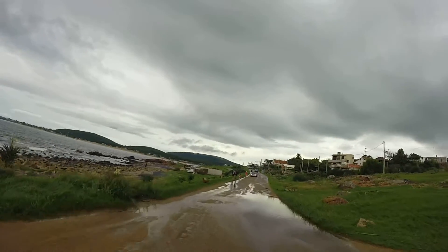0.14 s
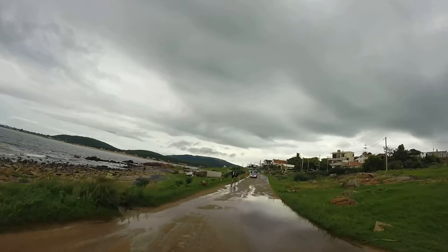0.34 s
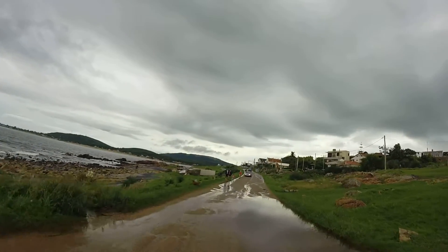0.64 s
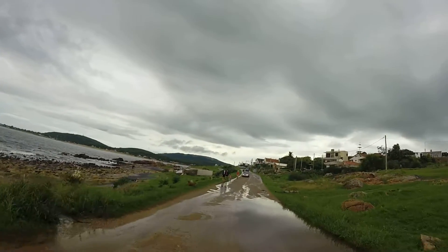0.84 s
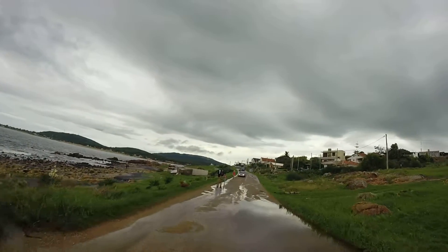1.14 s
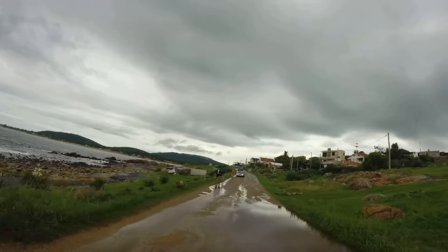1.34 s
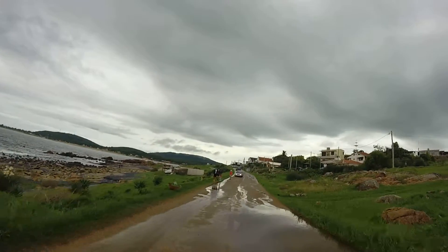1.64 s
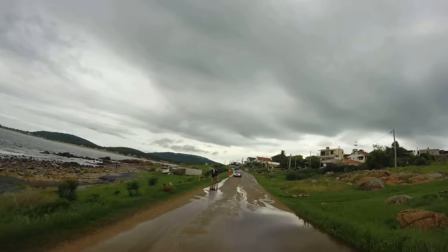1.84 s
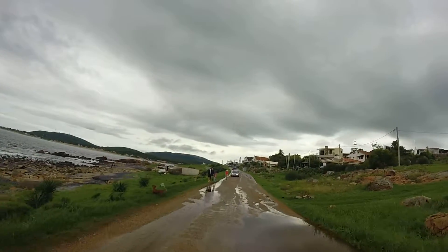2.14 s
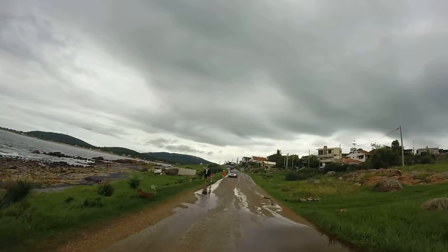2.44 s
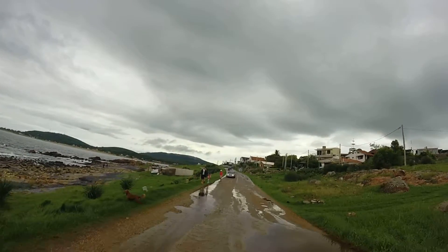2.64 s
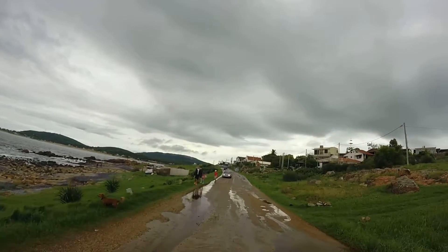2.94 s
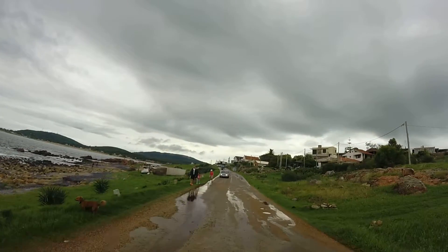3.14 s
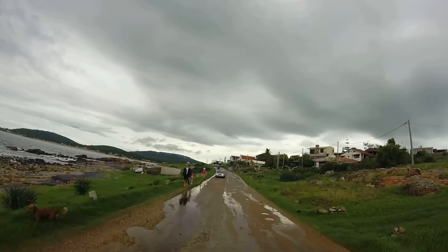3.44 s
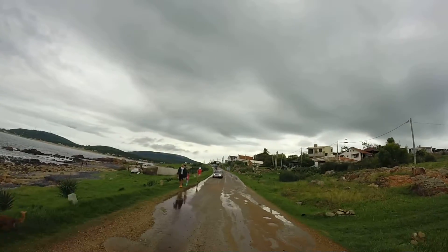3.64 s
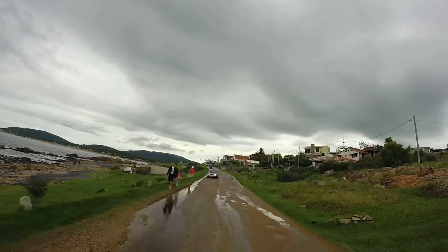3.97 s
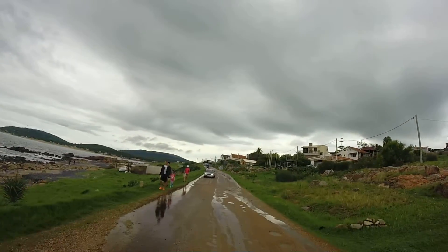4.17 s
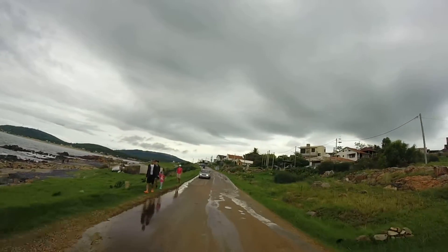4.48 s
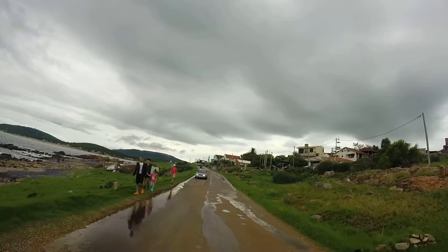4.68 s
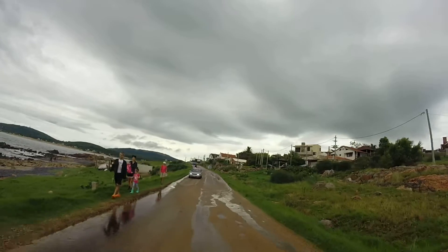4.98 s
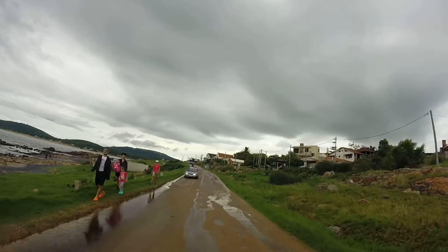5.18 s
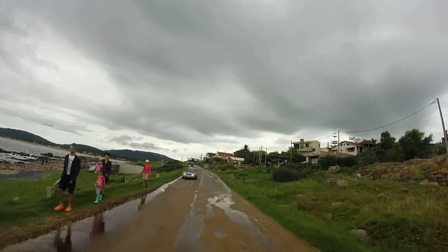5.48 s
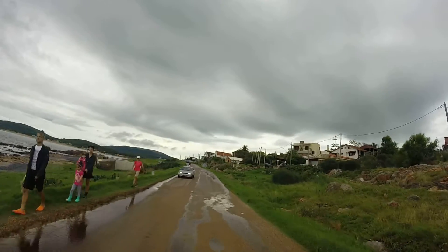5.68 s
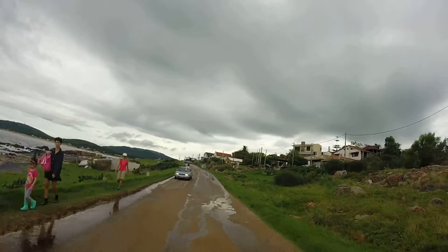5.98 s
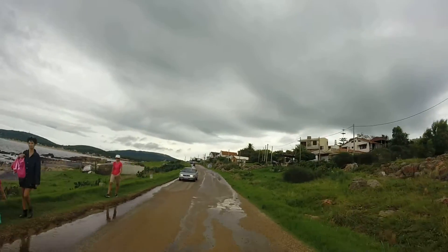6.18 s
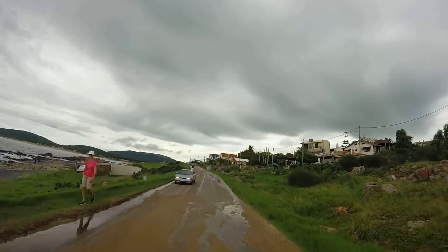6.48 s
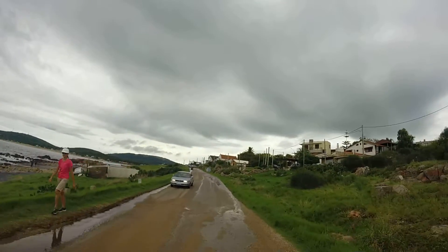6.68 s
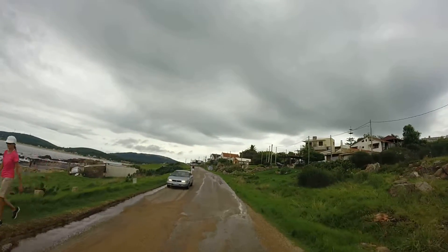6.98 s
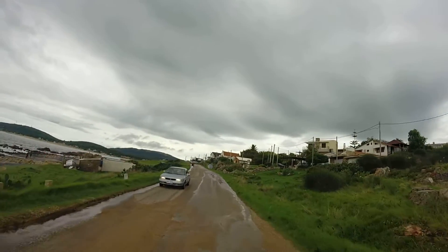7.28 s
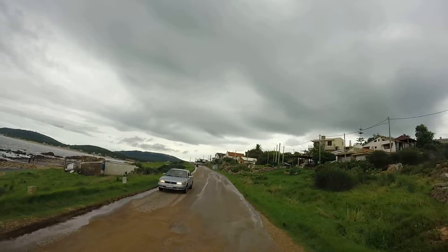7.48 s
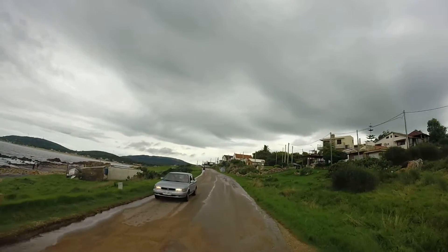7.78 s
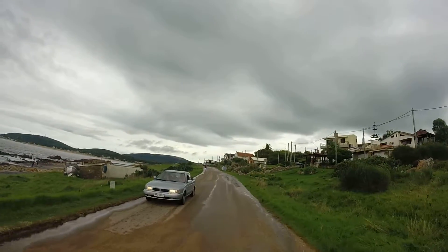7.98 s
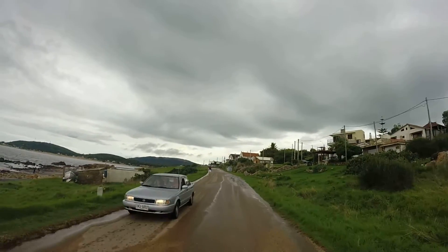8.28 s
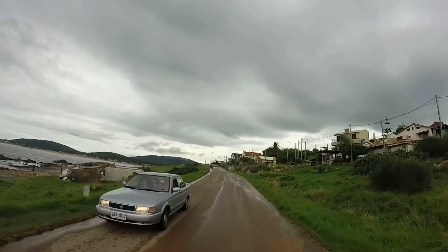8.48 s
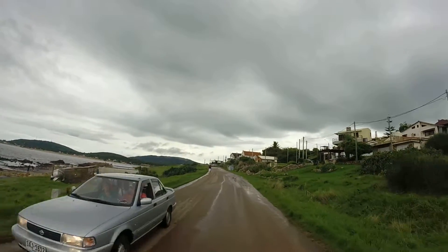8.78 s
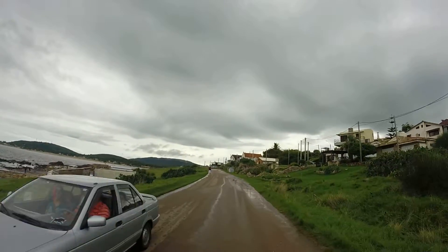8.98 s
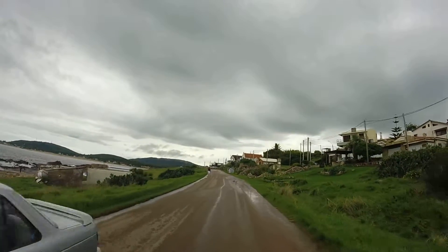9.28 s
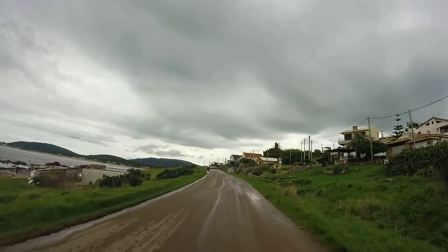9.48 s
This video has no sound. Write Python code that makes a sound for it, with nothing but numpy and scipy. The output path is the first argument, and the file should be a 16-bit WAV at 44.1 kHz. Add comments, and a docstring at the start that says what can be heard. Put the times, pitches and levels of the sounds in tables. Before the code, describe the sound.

A deep, wavering rumble runs throughout, picked up by a microphone mounted on a car moving over wet dirt. A bump and a clattering loose part come first, then soft splashes and ticks of grit under the wheels. Past the middle comes a cluster of dull thuds and sharp clacks, followed by a few separate knocks. A thin, watery tyre hiss comes and goes beneath the rumble.

```python
"""Car on a wet dirt road

Heard from the car's body, which the road shakes into one low, booming resonance. Bumps thud and a loose
part clacks; the mount squeaks. Tyres roar, hiss and crackle on wet grit; puddles spray the underside.
At the end the mist of an oncoming car swells faintly."""
import sys
import numpy as np
from scipy import signal
from scipy.fft import rfft, irfft, next_fast_len
from scipy.io import wavfile
from scipy.ndimage import uniform_filter1d, map_coordinates

SR = 44100
rng = np.random.default_rng(int(sys.argv[2]) if len(sys.argv) > 2 else 0)


def to_wav(s):
    """Save 16-bit WAV."""
    ch = np.atleast_2d(s).T  # columns
    pcm = np.round(np.clip(ch, -1, 1) * 32767)  # PCM
    wavfile.write(sys.argv[1], SR, pcm.astype(np.int16))


N = 424241

# mount squeaks: t/s, level/dB, f/Hz, length/s
MOUNT_SQUEAKS = [(1.7, -61, 4620, .08), (5.97, -46.5, 2990, 0.066), (7.596, -49, 1315, 0.069)]
# struck metal: t/s, level/dB, f/Hz, t60/s
METAL_PINGS = [(4.093, -38, 1816, 0.12)]
# wet grit hitting the arches: t/s, level/dB
GRIT_HITS = [(0.523, -35), (0.75, -32), (0.906, -32), (1.888, -26.5), (2.126, -29.5), (4.346, -29.5),
             (7.881, -31.5), (8.112, -29.5), (8.19, -32), (8.284, -36.5), (9.192, -31)]
# water under the treads: t/s, hiss/dB, mist/dB
TREAD_WATER = [(0.0, -56.5, -65), (0.38, -61.5, -67), (0.88, -51.5, -58.5), (1.8, -52.5, -61),
               (1.92, -50, -60.5), (2.34, -54, -62), (2.93, -52, -60), (3.05, -57, -62), (3.79, -53, -61),
               (4.47, -53, -59), (5.21, -55.5, -60.5), (6.21, -50.5, -59.5), (6.63, -56, -61),
               (8.08, -49.5, -55.5), (8.8, -51.5, -57), (9.62, -50.5, -53)]
# puddle crossings: t/s, length/s, spray/dB
PUDDLE_CROSSINGS = [(0.553, 0.24, -51), (1.217, 0.053, -46), (1.36, 0.064, -47), (1.466, 0.37, -46),
                    (1.855, 0.16, -43.5), (1.998, 0.12, -41), (2.192, 0.24, -48.5), (2.5, 0.048, -45),
                    (2.612, 0.14, -45.5), (3.164, .17, -53), (3.71, 0.21, -54.5), (4.325, 0.18, -45),
                    (4.813, 0.11, -49.5), (5.484, .3, -46), (6.747, .07, -52.5), (7.487, .08, -52),
                    (8.44, 0.1, -53.5), (9.103, 0.32, -49.5)]
# loose part striking: t/s, level/dB, relative knock/dB, relative snap/dB, relative rattle/dB
PART_STRIKES = [(0.039, -20.5, -9.5, -15, -11), (0.083, -35, -7, -8, -5), (0.107, -36, -9, -12, -8),
                (0.123, -32.5, -5, -12, -11), (0.198, -39.5, 4, -24, -4), (0.226, -43.5, 1, -21, 3.5),
                (0.282, -37, -6, -21, -8), (4.0915, -23, -15.5, -8.5, -7), (5.4087, -17.5, -8, -20.5, -41),
                (5.8523, -14, -10, -17.5, -19), (5.92, -33.5, -4, -35, -10), (6.0697, -20.5, -5, -18, -9.5),
                (6.6656, -21, -11.5, -23, -19), (7.132, -25, -14, -23, -26),
                (8.0638, -12.5, -9, -16.5, -21)]
# wheels hitting bumps: t/s, level/dB, f/Hz, t60/s
WHEEL_BUMPS = [(.043, 0, 58.7, 0.16), (0.136, 4.5, 124.6, 0.046), (.198, -3, 109, 0.098),
               (0.294, -7.5, 87.5, 0.25), (.548, -9.5, 86, 0.17), (3.712, -8, 91.7, 0.34),
               (5.298, -14.5, 145, .12), (5.401, -4.5, 150, 0.056), (5.551, -2, 100.4, 0.13),
               (5.846, -5.5, 113.1, .21), (5.899, -2, 91.5, 0.12), (5.957, -3, 120.4, 0.11),
               (6.126, 2.5, 90, 0.049), (6.201, 0.5, 87, 0.071), (7.134, -2.5, 98, 0.097),
               (7.154, -5, 131, 0.17), (8.056, 0, 103, 0.087), (8.242, -2, 85, 0.13)]
# suspension bottoming out: t/s, peak/dB
JOLTS = [(0.1339, -11)]
# shaking by the road: t/s, sway/dB, tyre drumming/dB
ROAD_SHAKE = [(0.0, -22, -27), (0.44, -26.5, -39), (1.78, -32.5, -34.5), (2.18, -35, -34), (3.61, -34, -35),
              (3.79, -26, -35), (5.11, -27.5, -34), (6.03, -22.5, -31), (6.63, -26.5, -36),
              (7.15, -23.5, -32), (8.1, -28.5, -31.5), (9.62, -33.5, -31.5)]
# drive of the body resonance: t/s, level/dB
BOOM_DRIVE = [(0.0, -21.5), (0.34, -24.5), (0.4, -27.5), (0.72, -22), (0.82, -17.5), (1.14, -10),
              (1.25, -25), (1.36, -9), (1.68, -20), (1.78, -12), (2.49, -25), (2.59, -15.5), (2.79, -30),
              (2.91, -25), (4.21, -20.5), (4.39, -11.5), (4.77, -21.5), (4.95, -13.5), (5.13, -27.5),
              (5.33, -15.5), (5.69, -21), (6.23, -14), (7.11, -22.5), (7.25, -17.5), (7.72, -20),
              (7.84, -12), (8.85, -11.5), (9.26, -13), (9.44, -20), (9.62, -13.5)]

# water and grit spectra: f/Hz, relative level/dB
FINE_DROP_SPECTRUM = [(4500, -15), (6500, -0.5), (9000, 1), (11000, -3.5), (14000, -8), (15500, -17.5)]
GRIT_SPECTRUM = [(700, -25), (1350, -2.5), (2000, -10.5), (2650, 2.5), (3400, -2), (4100, -20.5),
                 (5700, -20.5), (8000, -45.5)]
HISS_SPECTRUM = [(800, -23.5), (1080, -8), (1330, 0), (1600, -5.5), (1870, -2.5), (2100, -10),
                 (2500, -16.5), (3450, -5), (3900, -18.5), (6000, -33.5)]
MIST_SPECTRUM = [(3000, -9), (3800, 0), (5000, 1), (5600, 1.5), (6200, -1.5), (6900, -7), (8000, -11.5),
                 (9500, -16.5), (11000, -17), (13000, -21.5), (14000, -25.5), (15000, -38.5)]
SPRAY_SPECTRUM = [(1200, -31.5), (2080, -11.5), (2380, -1), (2680, -2), (3000, -3.5), (3500, -10.5),
                  (3900, -21.5), (5000, -43.5), (9000, -71)]
# impact spectra: f/Hz, relative level/dB
CLICK_SPECTRUM = [(500, -41), (900, -4), (1100, -13), (1380, -1.5), (1620, -6), (1850, -1.5), (2080, 1.5),
                  (2250, -4.5), (2480, -2.5), (2900, -14), (3600, -23), (4500, -39.5)]
KNOCK_SPECTRUM = [(110, -12.5), (190, 4.5), (270, 5), (340, -3), (430, 4.5), (530, -11.5), (660, -0.5),
                  (800, -10), (1400, -47), (3000, -62)]
SNAP_SPECTRUM = [(2000, -30), (3300, -0.5), (4400, -3.5), (5400, 0), (6400, -17), (10000, -19),
                 (15000, -51.5)]
JOLT_SPECTRUM = [(70, -34.5), (160, 7.5), (270, -4), (380, -9.5), (450, -5.5), (540, -13), (700, -20),
                 (1200, -29), (2200, -37), (6000, -82)]
# rolling spectra: f/Hz, relative level/dB
ROAR_SPECTRUM = [(200, -5.5), (260, -2), (320, -4), (440, -4), (560, -5), (800, -8), (950, -9),
                 (1150, -12.5), (1500, -22), (2500, -61)]
SWAY_SPECTRUM = [(10, -17.5), (22, -8.5), (35, -0.5), (47, 7), (60, -3.5), (72, -5.5), (85, -7.5)]
DRUM_SPECTRUM = [(98, -20.5), (112, -3.5), (125, -9), (143, 6), (168, -9.5), (200, -10.5), (225, -19.5),
                 (260, -26), (305, -37)]


def amp(db):
    """Decibels to gain."""
    return 10 ** (np.asarray(db) / 20)


def unit(x):
    """Scale to rms 1."""
    return x / np.sqrt(np.mean(x ** 2) + 1e-20)


def gain(spectrum, hz):
    """Spectrum's gain on a log axis; -36 dB/octave beyond both ends."""
    knot_hz, db = np.transpose(spectrum)
    octave, knots = np.log2(hz + 1), np.log2(knot_hz + 1)
    octaves_beyond = np.maximum(knots[0] - octave, 0) + np.maximum(octave - knots[-1], 0)
    return amp(np.interp(octave, knots, db) - 36 * octaves_beyond)


def curves(rows):
    """Per-sample curve of each column after the time."""
    times_s, *columns = np.transpose(rows)
    return [np.interp(np.arange(N) / SR, times_s, column) for column in columns]


def wobble(rate_hz):
    """Smooth random curve, rate_hz knots a second."""
    knots = rng.standard_normal(int(N * rate_hz / SR) + 4)
    return map_coordinates(knots, [np.arange(N) * rate_hz / SR])


def filtered(x, response):
    """Apply a frequency response."""
    size = next_fast_len(N + SR // 2)
    return irfft(rfft(x, size) * response(np.fft.rfftfreq(size, 1 / SR)), size)[:N]


def coloured(x, spectrum):
    """Shape by a spectrum; rms 1."""
    return unit(filtered(x, lambda hz: gain(spectrum, hz)))


def steadied(x, span_s):
    """Flatten swells slower than span_s; quick beating stays."""
    power = np.abs(uniform_filter1d(x ** 2, max(int(span_s * SR), 1)))
    return unit(x / np.sqrt(power + 1e-9))


def blow(spectrum, size=4096):
    """Minimum-phase response of a struck part; peak 1."""
    magnitude = np.maximum(gain(spectrum, np.fft.rfftfreq(size, 1 / SR)), 1e-5)
    cepstrum = irfft(np.log(magnitude))
    cepstrum[1:size // 2] *= 2
    cepstrum[size // 2 + 1:] = 0
    response = irfft(np.exp(rfft(cepstrum)))
    return response / np.abs(response).max()


def ring(db, hz, t60_s, rise_s):
    """One decaying mode with a cushioned onset."""
    t = np.arange(SR // 3) / SR
    onset = 1 - np.exp(-(t / rise_s) ** 2)
    return amp(db - 60 * t / t60_s) * np.sin(2 * np.pi * hz * t) * onset


def patter(drops_per_s, spread_db, wash_db):
    """Uneven droplet impacts on an even wash of smaller ones."""
    sizes = amp(spread_db * np.minimum(rng.standard_exponential(N), 6))
    drops = (rng.random(N) < drops_per_s / SR) * sizes * rng.choice([-1, 1], N)
    return unit(drops) + amp(wash_db) * rng.standard_normal(N)


def add(track, start_s, sound):
    """Mix a sound in at start_s."""
    part = track[max(round(start_s * SR), 0):][:len(sound)]
    part += sound[:len(part)]


def oncoming_car(closest_s=11, closest_m=2.6, closest_db=-66, closing_m_per_s=11):
    """An approaching car's mist swells as 1/distance."""
    distance_m = np.hypot(closest_m, closing_m_per_s * (np.arange(N) / SR - closest_s))
    mist = coloured(patter(600, spread_db=2.5, wash_db=2), FINE_DROP_SPECTRUM)
    return amp(closest_db) * closest_m / distance_m * mist


def squeaks(waver=0.0044):
    """The rubbing mount sings briefly on a slightly unsteady pitch."""
    out = np.zeros(N)
    for start_s, db, hz, length_s in MOUNT_SQUEAKS:
        swell = np.hanning(int(length_s * SR))
        pitch_hz = hz * (1 + waver * wobble(150)[:len(swell)])
        add(out, start_s, amp(db) * swell * np.sin(2 * np.pi * np.cumsum(pitch_hz) / SR))
    return out


def pings():
    """Struck metal rings on one pitch."""
    out = np.zeros(N)
    for start_s, db, hz, t60_s in METAL_PINGS:
        add(out, start_s, ring(db, hz, t60_s, rise_s=0.0004))
    return out


def grit(t60_s=0.062):
    """Gobs of wet grit scatter on the arches in short bursts."""
    bursts, t = np.zeros(N), np.arange(SR // 8) / SR
    for start_s, db in GRIT_HITS:
        add(bursts, start_s, amp(db - 8 - 60 * t / t60_s))
    return bursts * coloured(rng.standard_normal(N), GRIT_SPECTRUM)


def tyres(mean_roar_db=-55, roar_db_per_hiss_db=0.66, fine_drop_db=-16, cluster_db=4):
    """Treads roar on dirt, squeeze water from wet grit and fling mist and clusters of fine drops."""
    hiss_db, mist_db = curves(TREAD_WATER)
    roar_db = mean_roar_db + roar_db_per_hiss_db * (hiss_db - hiss_db.mean())
    roar = amp(roar_db + 0.8 * wobble(11)) * coloured(rng.standard_normal(N), ROAR_SPECTRUM)
    hiss = amp(hiss_db + 1.4 * wobble(22))
    hiss *= coloured(patter(900, spread_db=4.5, wash_db=3), HISS_SPECTRUM)
    mist = amp(mist_db + 0.93 * wobble(12))
    mist *= coloured(patter(700, spread_db=3.5, wash_db=5.5), MIST_SPECTRUM)
    clusters = amp(cluster_db * wobble(14))
    fine_drops = coloured(patter(400, spread_db=-0.5, wash_db=2), FINE_DROP_SPECTRUM)
    return roar + hiss + mist + amp(mist_db + fine_drop_db) * unit(clusters * fine_drops)


def spray(film_db=-2.5, patchy_db=2, build_s=0.022, drain_s=0.064, slosh_db=1.4, gush_db=2):
    """Water drums on the arches: thin patter from the road's film, a gush in each puddle."""
    t = np.arange(N) / SR
    hiss_db, _ = curves(TREAD_WATER)
    power = amp(hiss_db + film_db + patchy_db * np.minimum(wobble(14), 1)) ** 2
    for start_s, length_s, db in PUDDLE_CROSSINGS:
        build = np.clip((t - start_s) / build_s, 0, 1)
        drain = np.exp(-np.maximum(t - start_s - length_s, 0) / drain_s)
        power += (amp(db) * build * drain) ** 2
    flow = np.sqrt(power) * amp(slosh_db * wobble(18) + gush_db * wobble(70))
    return flow * coloured(patter(1500, spread_db=2.5, wash_db=-2), SPRAY_SPECTRUM)


def clacks(rebound_s=0.001472, rebound_db=-7, rattle_t60_s=0.094):
    """A loose part strikes, rebounds at once and rattles as it settles."""
    out = np.zeros(N)
    click, knock, snap = blow(CLICK_SPECTRUM), blow(KNOCK_SPECTRUM), blow(SNAP_SPECTRUM)
    t = np.arange(len(click)) / SR
    for start_s, db, knock_db, snap_db, rattle_db in PART_STRIKES:
        hit = amp(db + 3) * (click + amp(knock_db + 2) * knock + amp(snap_db) * snap)
        add(out, start_s, hit)
        add(out, start_s + rebound_s * rng.uniform(0.9, 1.1), amp(rebound_db) * hit)
        rattle = unit(signal.fftconvolve(rng.standard_normal(len(t)), click)[:len(t)])
        add(out, start_s, amp(db + rattle_db - 2.5 - 60 * t / rattle_t60_s) * rattle)
    return out


def bumps(rise_s=0.0045, jolt_ring_db=-16.5):
    """Bumps swing the body briefly; the suspension bottoms out with a dull knock and rings."""
    out = np.zeros(N)
    for start_s, db, hz, t60_s in WHEEL_BUMPS:
        add(out, start_s, ring(db, hz, t60_s, rise_s))
    for start_s, db in JOLTS:
        add(out, start_s, amp(db) * blow(JOLT_SPECTRUM))
        add(out, start_s, ring(db + jolt_ring_db, hz=434, t60_s=0.077, rise_s=rise_s))
    return out


def body(boom_hz=88.55, width_hz=6.83, skirt_hz=45, cutoff_hz=160, flutter_db=3.5):
    """Road roughness drives the body's main resonance, its sway and the tyres' drumming."""
    def mode(hz, bandwidth_hz):
        damping = 1j * hz * bandwidth_hz
        return damping / (boom_hz ** 2 - hz ** 2 + damping)

    boom_db, = curves(BOOM_DRIVE)
    sway_db, drum_db = curves(ROAD_SHAKE)
    resonance = filtered(rng.standard_normal(N), lambda hz: mode(hz, width_hz) * mode(hz, skirt_hz))
    ruts = np.maximum(wobble(17), 0)
    rut_db = flutter_db * (ruts.mean() - ruts)  # the boom dips in each rut
    boom = amp(boom_db + rut_db) * steadied(unit(resonance), span_s=0.06)
    boom = filtered(boom, lambda hz: 1 / (1 + (hz / cutoff_hz) ** 8))
    sway = amp(sway_db) * steadied(coloured(rng.standard_normal(N), SWAY_SPECTRUM), span_s=0.2)
    drum = amp(drum_db) * steadied(coloured(rng.standard_normal(N), DRUM_SPECTRUM), span_s=0.15)
    return boom + sway + drum


def scene():
    """Mono sum at one point on the car."""
    rolling = body() + bumps() + tyres()
    return (rolling + oncoming_car() + spray() + grit() + clacks() + pings() + squeaks())[None]


def record(dry, top_hz=15700):
    """Brick-wall low-pass."""
    return filtered(dry[0], lambda hz: hz < top_hz)[None]


dry = scene()
out = record(dry)
to_wav(out)
```